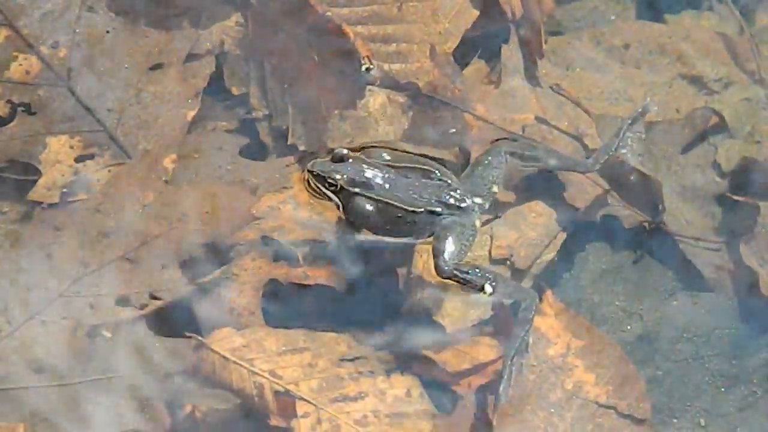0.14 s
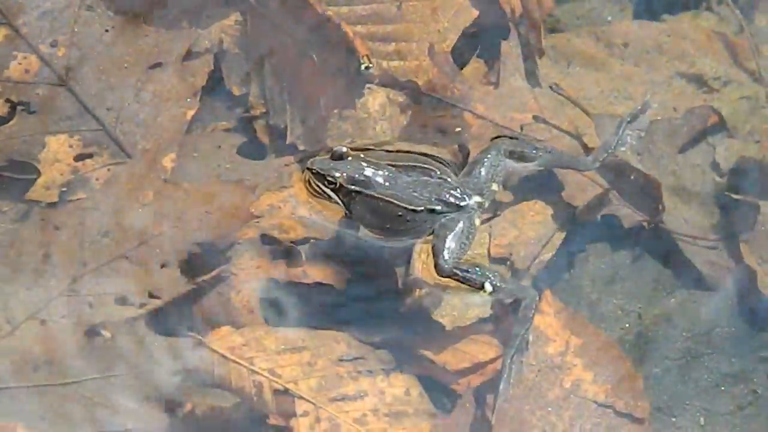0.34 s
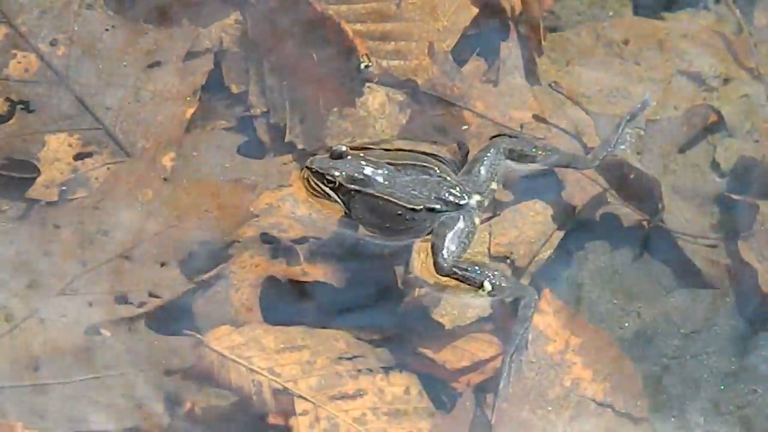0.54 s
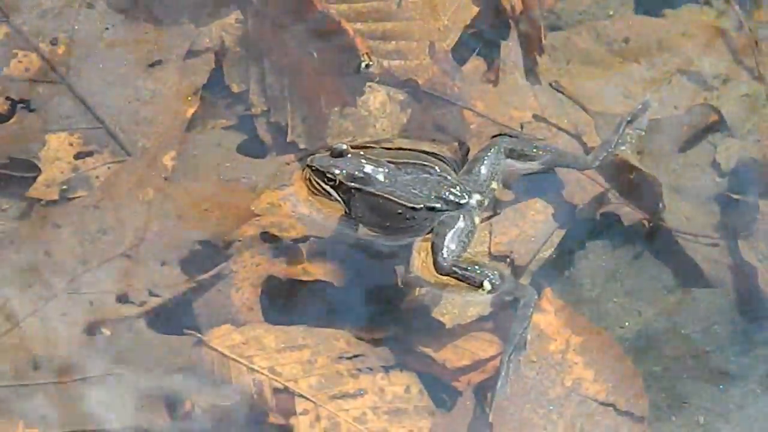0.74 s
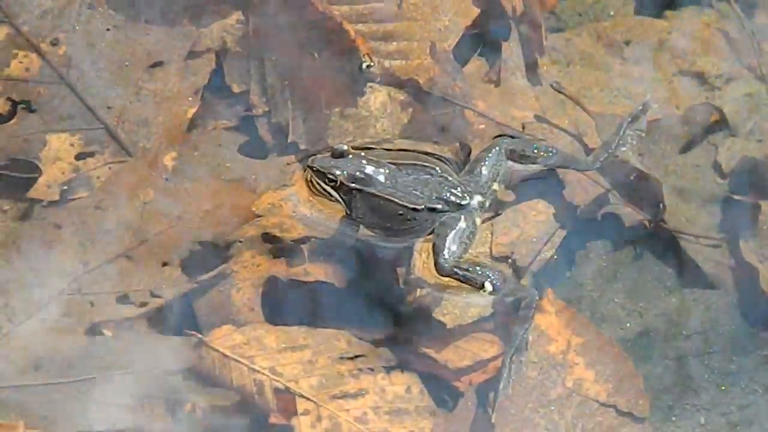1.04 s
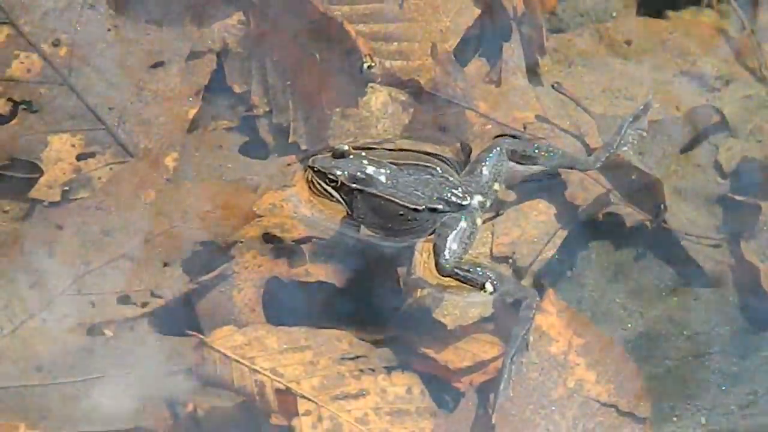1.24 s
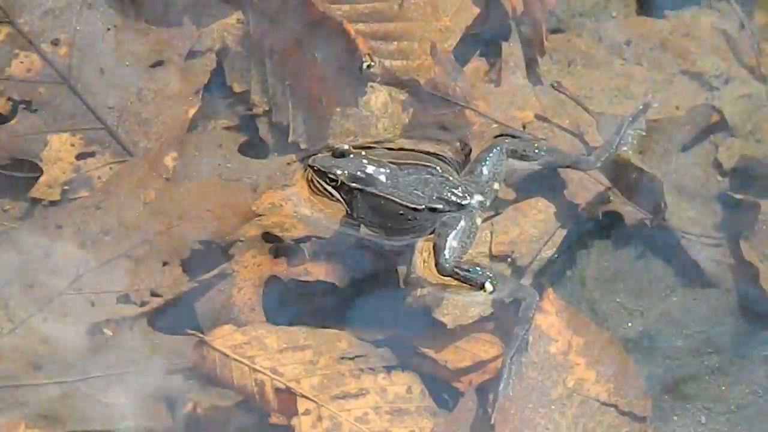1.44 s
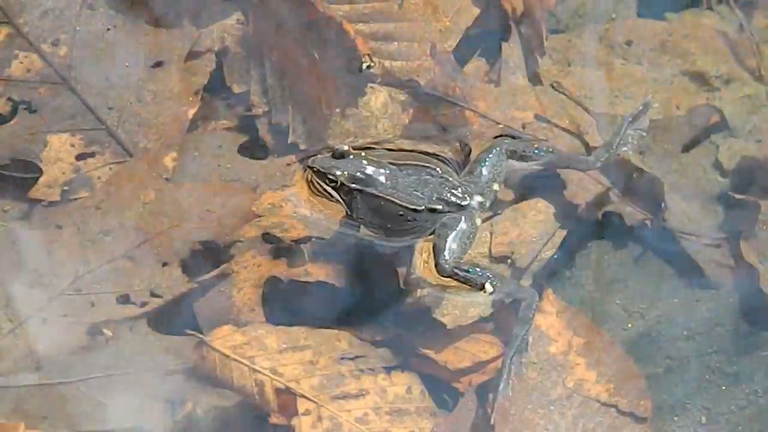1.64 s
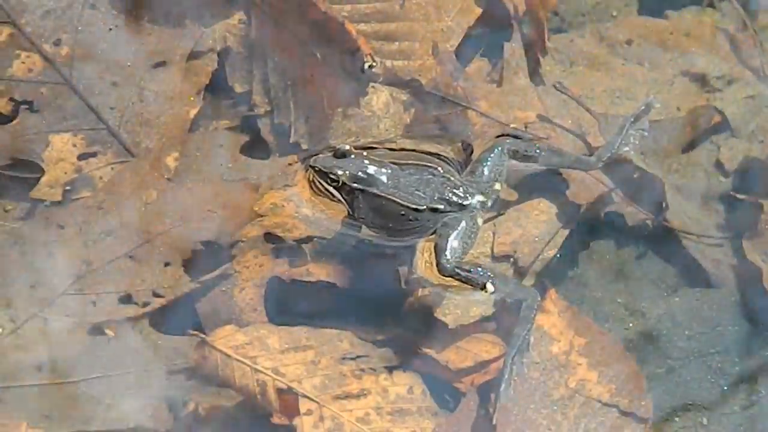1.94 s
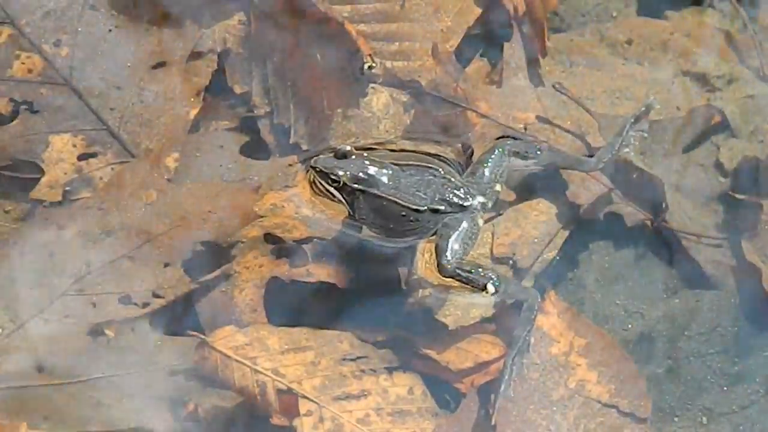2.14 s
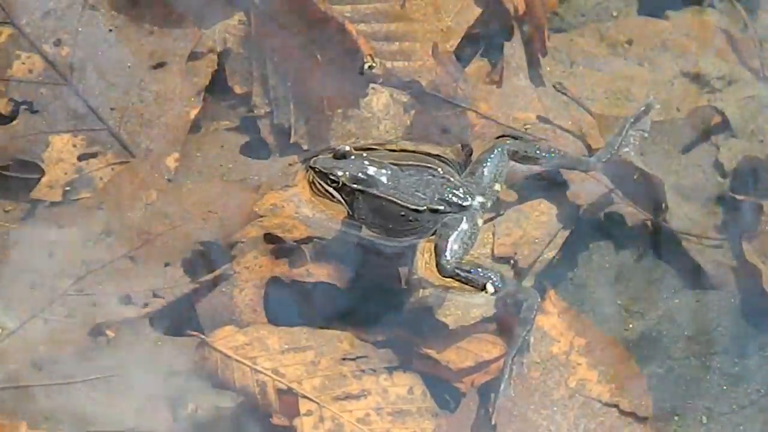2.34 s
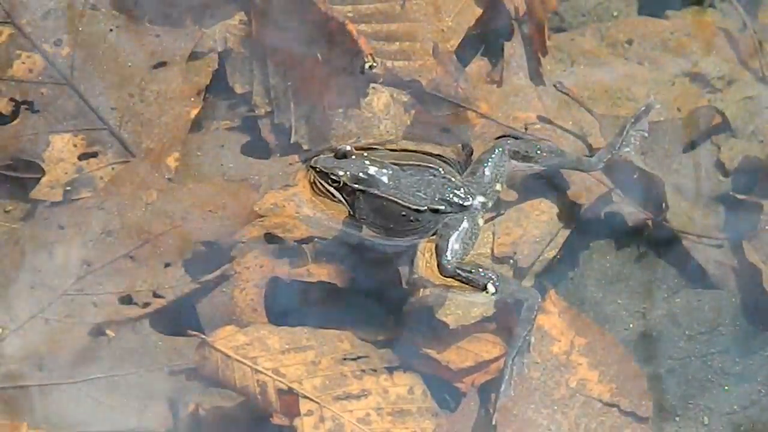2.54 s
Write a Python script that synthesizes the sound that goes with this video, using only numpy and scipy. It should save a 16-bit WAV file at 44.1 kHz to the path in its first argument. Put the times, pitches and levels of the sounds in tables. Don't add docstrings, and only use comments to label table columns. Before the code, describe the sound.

Many wood frogs give short, raspy, duck-like quacks that overlap near the stereo microphone, louder after the first second with sharp snaps; distant frogs blur into clucking, faint peepers whistle upward, and low rumble lies beneath.

```python
import sys
import numpy as np
from scipy import signal
from scipy.fft import rfft, irfft, next_fast_len
from scipy.io import wavfile
from scipy.ndimage import uniform_filter1d, minimum_filter1d, map_coordinates

SR = 44100
rng = np.random.default_rng(int(sys.argv[2]) if len(sys.argv) > 2 else 0)


def put_to_file(sound):
    columns = np.atleast_2d(sound).T
    safe = np.clip(columns, -1, 1)
    whole_steps = np.round(safe * 32767)
    wavfile.write(sys.argv[1], SR, whole_steps.astype(np.int16))


def boost_factor(decibels):
    exponent = np.asarray(decibels, float) / 20
    return 10 ** exponent


N = 118629

# start in seconds, length in seconds, place of the peak (0-1), level in dB, sac pitch in Hz.
EARLY_QUACKS = [(0.0, 0.03, 0.2, -7, 1648), (0.05, 0.023, 0.44, -28, 1395),
                (0.069, 0.029, 0.7, -20.5, 1502), (0.1, 0.042, 0.37, -25.5, 1415),
                (0.141, 0.036, 0.4, -31.5, 1480), (0.17, 0.04, 0.2, -23.5, 1424),
                (0.211, 0.036, 0.28, -23, 1525), (0.255, 0.02, 0.7, -21, 1500),
                (0.272, 0.035, 0.1, -14, 1527), (0.307, 0.04, 0.4, -20.5, 1395),
                (0.35, 0.03, 0.6, -27.5, 1378), (0.380, 0.05, 0.4, -17.5, 1397),
                (0.426, 0.039, 0.94, -21.5, 1500), (0.462, 0.035, 0, -15.5, 1378),
                (0.504, 0.036, 1, -15.5, 1414), (0.531, 0.023, 0.5, -23.5, 1574),
                (0.551, 0.054, 0.2, -19, 1430), (0.626, 0.027, 0.3, -16.5, 1594),
                (0.643, 0.065, 0.43, -14, 1428), (0.704, 0.064, 0.9, -23, 1369),
                (0.778, 0.049, 0.65, -15.5, 1618), (0.827, 0.061, 0.38, -12, 1500)]
# start in seconds, pulses per second, pitch slide over the call as a share.
CLEAR_VOICES = [(0, 194, 0), (.274, 240, -.1), (.380, 130, 0), (.551, 168, -.05), (.827, 120, 0),
                (1.208, 230, -.15), (1.274, 387, 0), (1.306, 445, 0), (1.351, 250, -.1), (1.661, 208, -.08),
                (1.830, 172, 0), (1.934, 188, .12), (2.073, 156, -.05), (2.256, 190, .16),
                (2.409, 175, .12), (2.671, 200, 0)]
# share of the sac pitch, width in Hz, level in dB.
SAC = [
    (0.519, 132, -7),
    (.86, 132.4, -1.5),
    (1, 112.3, 2.5),
    (1.151, 172.3, -3),
    (1.451, 401, -16),
    (1.85, 407, -23),
    (2.449, 893, -46),
    (3.2, 199.5, -41),
]

RATE_LO, RATE_HI = 125, 340
JITTER = .05
NOISE_LEN = 6000


def evened(x):
    return x / np.sqrt(np.mean(x ** 2) + 1e-20)


def read(hz, f, value):
    return np.interp(np.log(hz + 1), np.log(np.add(f, 1)), value)


def add(mix, s, sound):
    part = mix[:, max(round(s * SR), 0):][:, :sound.shape[1]]
    part += sound[:, :part.shape[1]]


def ring(pulses, sac_hz, side, bright_db=0, narrow=1, sac=SAC):
    spread_s, spread_db, low_cut_hz, top_hz = .00006, 3, 470, 5130
    size = next_fast_len(len(pulses) + SR // 20)
    f = np.fft.rfftfreq(size, 1 / SR)
    body = 0
    for k, (ratio, width, db) in enumerate(sac):
        level = (-1) ** k * boost_factor(db + bright_db * (ratio > 2))
        body = body + level * 1j * f * width / ((ratio * sac_hz) ** 2 - f ** 2 + 1j * f * width * narrow)
    high, low = 1j * f / low_cut_hz, 1j * f / top_hz
    body = body * (high ** 2 / (high ** 2 + 0.83 * high + 1)) ** 2
    body = body / (low ** 2 + 0.49 * low + 1) ** 2
    lean = np.array([[.5], [-.5]]) * side
    arrival = np.exp(2j * np.pi * f * (lean * spread_s - .0005))
    return irfft(rfft(pulses, size) * body * boost_factor(lean * spread_db) * arrival, size)


def bend(call, glide, span):
    n = np.arange(call.shape[1])
    at = np.cumsum(1 + glide * (np.minimum(n / span, 1.5) - .5))
    return np.array([map_coordinates(side, [at], order=3) for side in call])


def opening():
    s, length, peak_at, db, hz = EARLY_QUACKS[0]
    rate = CLEAR_VOICES[0][1]
    lead = 5 / rate
    t = np.arange(-lead, length, 1 / SR)
    beat = np.diff(np.floor(t * rate + 0.27), prepend=-5)
    fade_db = -16 * np.maximum(t / length, 0) ** 2
    drive = beat * boost_factor(fade_db + 1.3 * rng.standard_normal(len(t)))
    clear_sac = SAC[:1] + SAC[2:4] + SAC[6:]
    call = ring(drive, hz, 0, -7.5, 0.45, clear_sac)[:, round(lead * SR):]
    call = bend(call, -.08, length * SR)
    return boost_factor(db) * call / np.sqrt(np.mean(call[:, :SR // 100] ** 2))


def air(gain):
    # frequency in Hz, level in dB per Hz.
    rumble = [
        (15, -51.5),
        (25, -31),
        (75, 2.5),
        (134, -2),
        (317, -10),
        (400, -10.5),
        (520, -37.5),
        (880, -120),
    ]
    rumble_db, same, hiss_db, hiss_tilt_db = -43.5, .82, -65.5, 3
    f = np.fft.rfftfreq(N, 1 / SR)
    a, b, c, d = rng.standard_normal((4, N))
    right = same * a + np.sqrt(1 - min(same, 1) ** 2) * b
    low = irfft(rfft([a, right]) * boost_factor(read(f, *np.transpose(rumble))), N)
    tilt = (f > 400) * boost_factor(hiss_tilt_db * np.log2(f / 8000 + .05))
    hiss = irfft(rfft([c, 0.83 * (c + d)]) * tilt, N)
    return boost_factor(rumble_db) * evened(low) * gain + boost_factor(hiss_db) * evened(hiss) * gain ** 2.0


def quack(length, peak_at, db, sac_hz, rate, jitter, side, noise, glide=None, onset=1):
    uneven_db, sag, breathy, edge_db = 2, .1, 0.06, -11.5
    u = np.arange(min(round(length * SR), NOISE_LEN)) / (length * SR)
    wander = jitter * evened(uniform_filter1d(noise[0], size=150))[:len(u)]
    turns = np.cumsum(rate * (1 - sag * (2 * u - 1) ** 2 + wander)) / SR + .9
    pulse_db = uneven_db * jitter / JITTER * noise[1, np.int_(turns)]
    beat = np.diff(np.floor(turns), prepend=0) * boost_factor(pulse_db)
    drive = evened(beat) + breathy * noise[2, :len(u)] * np.exp(-4 * (turns % 1))
    swell, fade = onset * (1 - u / peak_at), (u - peak_at) / (1 - peak_at)
    shape = boost_factor(edge_db * np.where(u < peak_at, swell, fade) ** 2)
    bright_db = 3 * np.clip(noise[1, -1], -2, 2)
    call = ring(drive * shape, sac_hz, side, bright_db, narrow=.7)
    scale = np.sqrt(np.sum(call ** 2) / 2 / np.sum(shape ** 2))
    if glide is None:
        glide = .2 * np.tanh(noise[1, -2])
    if glide:
        call = bend(call, glide, len(u))
    return boost_factor(db) * call / scale


def pond(x):
    t60 = .16
    t = np.arange(SR // 4) / SR
    signs = rng.choice([-1., 1.], (2, len(t)))
    taps = signs * (rng.random((2, len(t))) < .04) * boost_factor(-60 * t / t60) * (t > .002)
    taps[1] = 0.97 * taps[0] + 0.49 * taps[1]
    taps = taps / np.linalg.norm(taps, axis=1, keepdims=True)
    return signal.fftconvolve(x, taps, axes=1)[:, :N]


def far(count=150):
    far_db, spread_db, wet_db = -25.5, 1, 1
    out = np.zeros((2, N))
    for a in rng.random((count, 6)):
        length, db, hz = .03 + .04 * a[1], spread_db * 2 * a[2], 1300 + 380 * a[3]
        rate, side = RATE_LO + (RATE_HI - RATE_LO) * a[4], 3 * (a[5] - .5)
        noise = rng.standard_normal((3, NOISE_LEN))
        add(out, a[0] * N / SR, quack(length, 0.32, db, hz, rate, JITTER, side, noise, 0))
    out = evened(out)
    return boost_factor(far_db) * (out + boost_factor(wet_db) * pond(out))


def held(x):
    hold = .66
    peak = -minimum_filter1d(-abs(x).max(axis=0), size=241)
    return x / uniform_filter1d(np.maximum(peak / hold, 1), size=121)


def snaps(out):
    snap_times = [0.9422, 1.0781, 1.1404, 1.1478, 1.6669, 1.9971, 2.0330, 2.0382, 2.0437, 2.0455, 2.4293]
    for s in snap_times:
        snap = ring(np.ones(1), 1542, 0)
        add(out, s - .001, boost_factor(-6) * snap / abs(snap).max())
        add(out, s, boost_factor(-26) * np.array([[.5], [1]]))


def near():
    # start in seconds, length in seconds, place of the peak (0-1),
    # level in dB, sac pitch in Hz.
    later_quacks = [(0.912, 0.041, 1, -9.5, 1396), (0.947, 0.031, 0.6, -10.5, 1586),
                    (0.968, 0.063, 0.46, -13, 1364), (1.03, 0.09, 0.47, -11, 1550),
                    (1.114, 0.054, 0.4, -9, 1383), (1.185, 0.024, 0.7, -18, 1500),
                    (1.208, 0.034, 0.4, -12, 1325), (1.274, 0.032, 0.99, -15.5, 1489),
                    (1.306, 0.039, 0.39, -15.5, 1615), (1.351, 0.035, 0.067, -14.5, 1350),
                    (1.411, 0.059, 0.7, -18, 1500), (1.49, 0.036, 0.59, -12, 1494),
                    (1.525, 0.07, 0.35, -12, 1482), (1.578, 0.066, 0.26, -13, 1390),
                    (1.661, 0.038, 0.15, -11.5, 1502), (1.698, 0.03, 0.78, -15.5, 1472),
                    (1.731, 0.069, 0.42, -15.5, 1438), (1.8, 0.03, 0.5, -19.5, 1590),
                    (1.830, 0.032, 0.54, -12.5, 1552), (1.865, 0.023, 0.69, -13.5, 1547),
                    (1.9, 0.031, 0.82, -32.5, 1370), (1.934, 0.031, 0.51, -9.5, 1623),
                   (1.975, 0.097, 0.6, -8.5, 1560), (2.073, 0.054, 0.087, -19.5, 1520),
                   (2.127, 0.052, 0.83, -17, 1537), (2.177, 0.03, 0.71, -19, 1318),
                   (2.208, 0.045, 0.75, -20.5, 1388), (2.256, 0.058, 0.36, -14, 1500),
                   (2.319, 0.018, 0.4, -13, 1416), (2.337, 0.028, 0.67, -12, 1543),
                   (2.364, 0.041, 0.13, -12, 1443), (2.409, 0.043, 0.5, -10, 1560),
                   (2.468, 0.022, 0.43, -24.5, 1508), (2.497, 0.043, 0.94, -24, 1470),
                   (2.519, 0.043, 0.72, -30.5, 1413), (2.558, 0.04, 0.76, -16.5, 1452),
                   (2.611, 0.05, 0.34, -18, 1484), (2.671, 0.028, 0.3, -11.5, 1540)]
    crowd_db, behind_db, detune = (-3.5, -7, -8), -6.5, 0.17
    out = np.zeros((2, N))
    for s, length, peak_at, db, hz in EARLY_QUACKS[1:] + later_quacks:
        a, noise = rng.random((3, 3)), rng.standard_normal((3, 3, NOISE_LEN))
        alone = [(rate, glide) for start, rate, glide in CLEAR_VOICES if abs(start - s) < .006]
        peak_at = np.clip(peak_at, .1, .9)
        if alone:
            rate, glide = alone[0]
            voice = quack(length, peak_at, db, hz, rate, JITTER * .7, a[0, 0] - .5, noise[0], glide, onset=.45)
            add(out, s, voice)
        for k in range(3):
            rate = RATE_LO + (RATE_HI - RATE_LO) * a[k, 0]
            frog_db = db + crowd_db[k] + behind_db * bool(alone)
            frog_hz = hz * (1 + detune * (a[k, 1] - .5))
            glide = 0 if k else None
            frog = quack(length, peak_at, frog_db, frog_hz, rate, JITTER, 2 * a[k, 2] - 1, noise[k], glide)
            add(out, s, frog)
    out = held(out)
    add(out, 0, opening())
    snaps(out)
    return out


def peepers():
    # start in seconds,
    # length in seconds, starting pitch in Hz, level in dB.
    whistles_and_yelps = [(0.078, .11, 2800, -53.5), (0.289, 0.063, 2957, -43.5), (0.343, 0.043, 2400, -41),
                          (0.411, .11, 2590, -35), (.405, .03, 2110, -27), (0.801, .085, 2816, -37.5),
                          (.885, 0.096, 3026, -37.5), (.69, 0.082, 2700, -37.5), (1.11, .08, 2894, -34),
                          (1.234, .10, 2610, -30.5), (1.511, .125, 2826, -36), (1.799, .09, 2480, -35),
                          (1.805, .02, 2423, -20), (1.86, .10, 2897, -39), (1.898, .11, 2522, -33.5),
                          (1.968, .13, 2500, -33.5), (2.511, 0.13, 2353, -39)]
    rise_hz_per_s, left_db, flutter_depth_db = 2900, 3.5, 4
    out = np.zeros((2, N))
    for s, length, hz, db in whistles_and_yelps:
        t, lag = np.arange(0, length, 1 / SR), rng.uniform(-0.85, 1)
        turn = 2 * np.pi * (hz * t + rise_hz_per_s * t ** 2 / 2) + np.array([[0], [lag]])
        wander = evened(uniform_filter1d(rng.standard_normal(NOISE_LEN), size=300))[:len(t)]
        level = boost_factor(db + flutter_depth_db * wander + np.array([[left_db], [0]]))
        add(out, s, level * np.sin(np.pi * t / length) ** .5 * np.sin(turn))
    return out + boost_factor(-8) * pond(out)


def scene():
    # time in seconds, gain in dB.
    gain_curve = [
        (.04, -8),
        (0.331, -8),
        (0.418, 0),
        (2.05, 1),
        (2.132, -4),
        (2.42, 2.5),
        (2.482, -7),
        (2.69, 3),
    ]
    close = near()
    gain = boost_factor(np.interp(np.arange(N) / SR, *np.transpose(gain_curve)))
    return close + boost_factor(-10) * pond(close) + peepers() + gain * far() + air(gain)


def low_pass(x):
    return signal.sosfilt(signal.butter(12, 15830, fs=SR, output="sos"), x)


def record(dry):
    # frequency in Hz, left minus right in dB, left's lead in radians.
    ports = [
        (700, -3, 0.16),
        (1500, -2, 0.007),
        (2400, -2, 0.074),
        (4300, 5, .3),
        (7000, 1, 0.062),
    ]
    ceiling = .99
    size = next_fast_len(N + SR // 10)
    f = np.fft.rfftfreq(size, 1 / SR)
    hz, db, lead = np.transpose(ports)
    half = boost_factor(read(f, hz, db) / 2) * np.exp(.5j * read(f, hz, lead))
    heard = irfft(rfft(dry, size) * np.array([half, 1 / half]), size)[:, :N]
    return low_pass(np.clip(heard, -ceiling, ceiling))


dry = scene()
out = record(dry)
put_to_file(out)
```